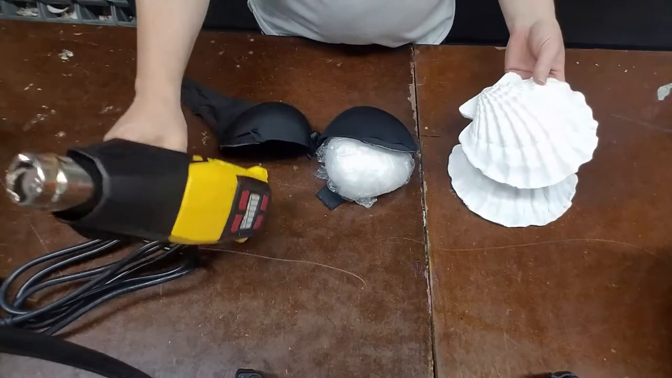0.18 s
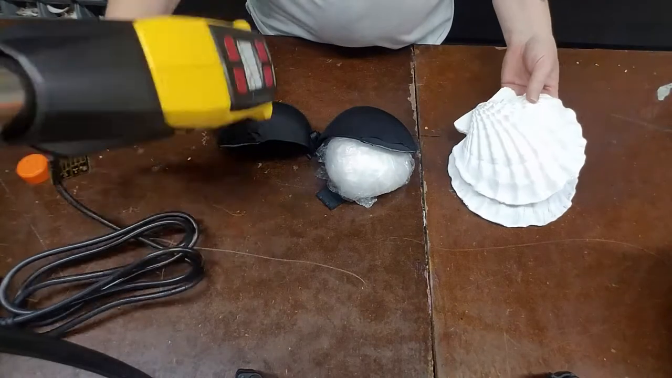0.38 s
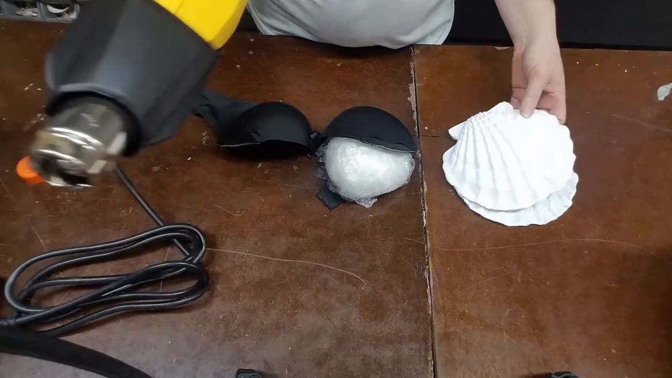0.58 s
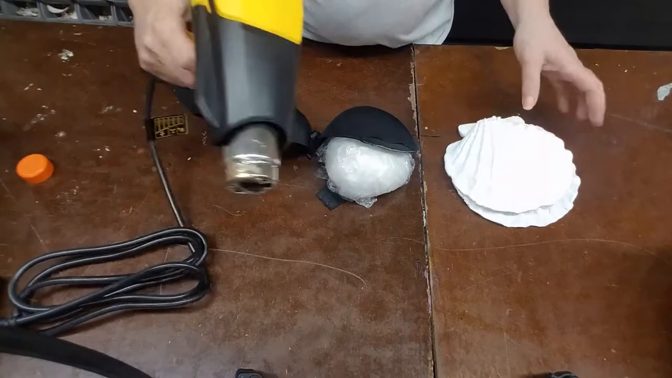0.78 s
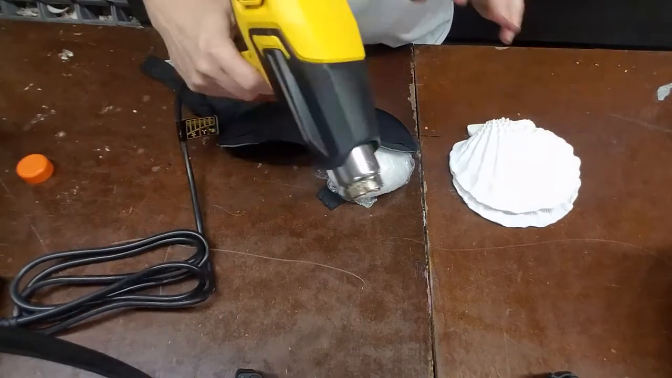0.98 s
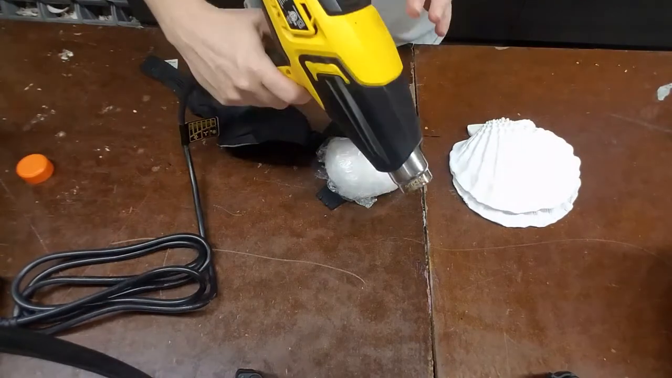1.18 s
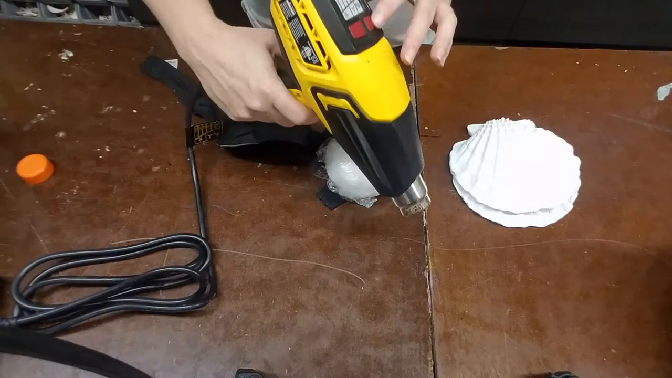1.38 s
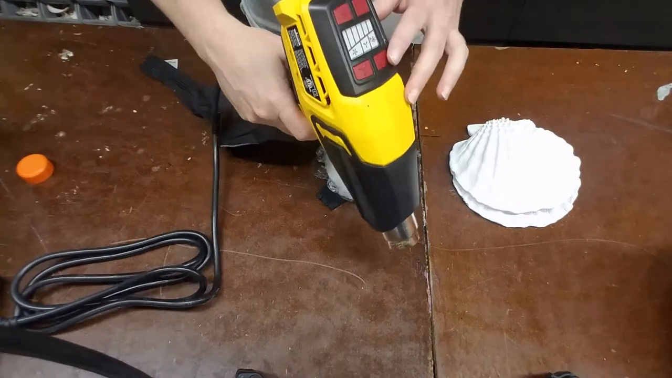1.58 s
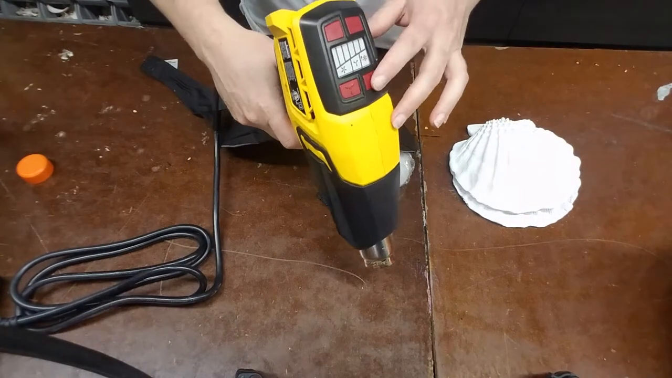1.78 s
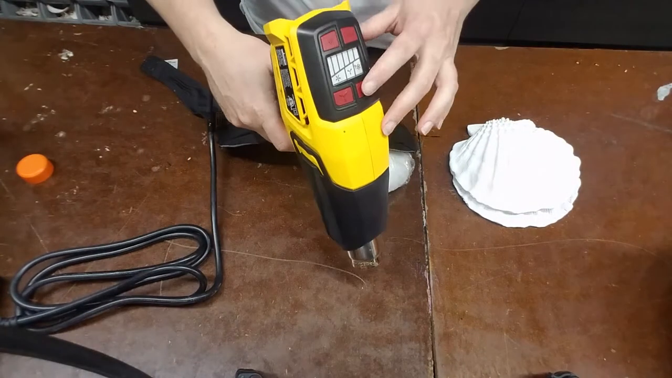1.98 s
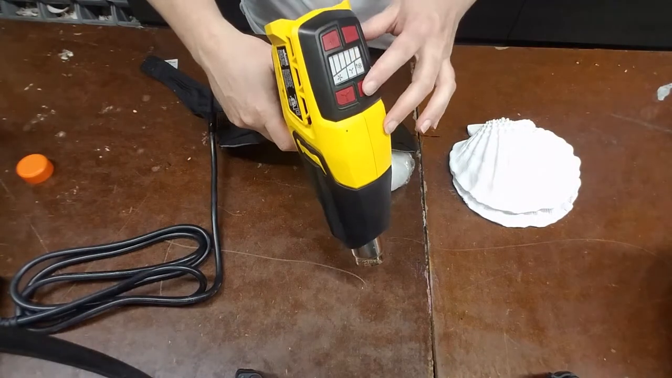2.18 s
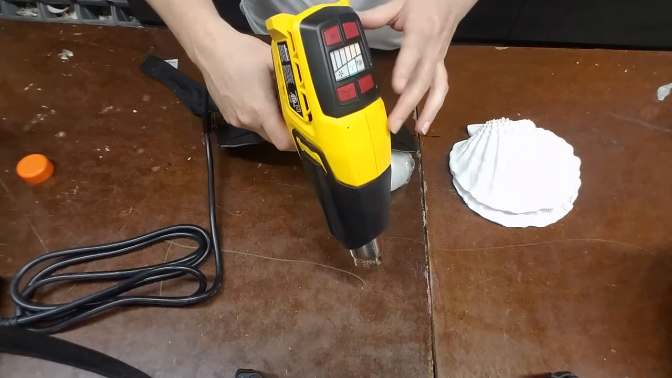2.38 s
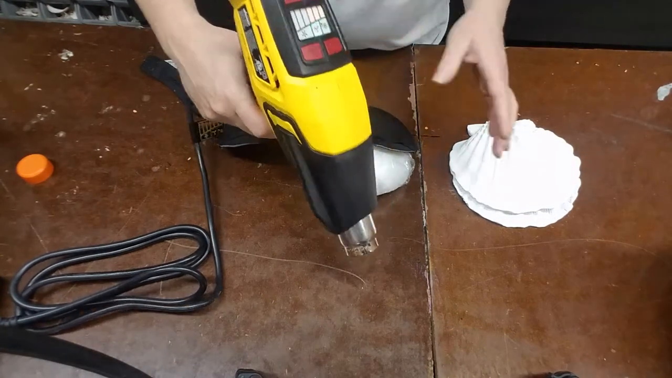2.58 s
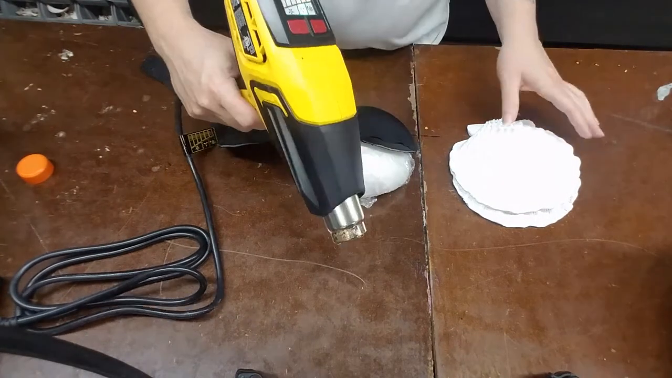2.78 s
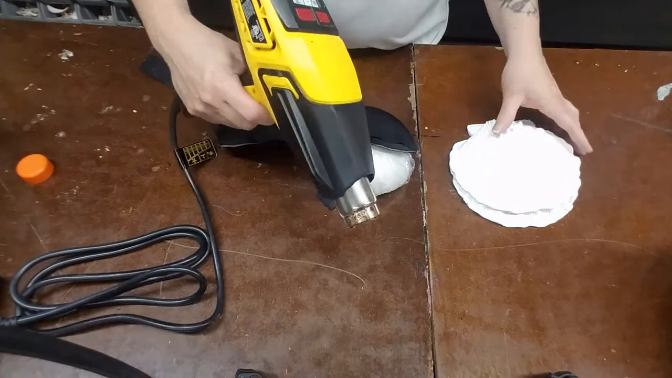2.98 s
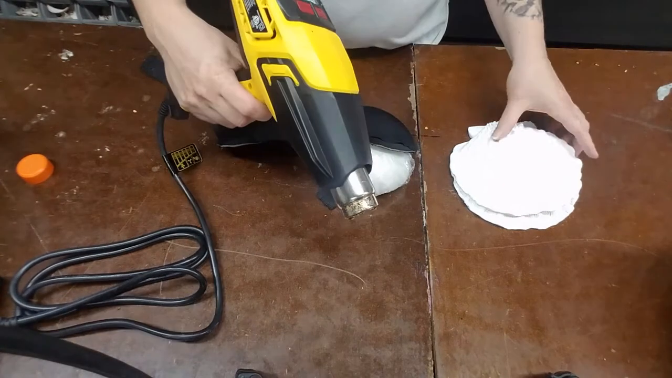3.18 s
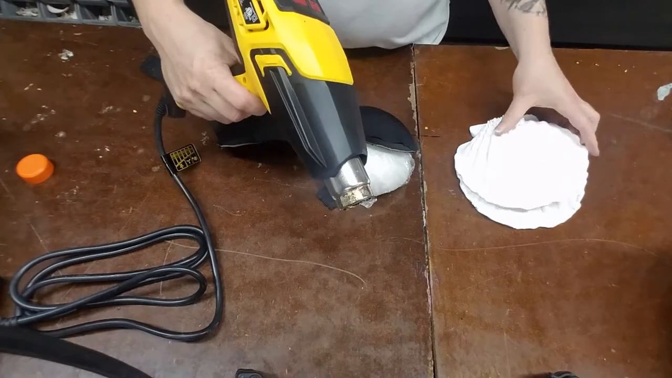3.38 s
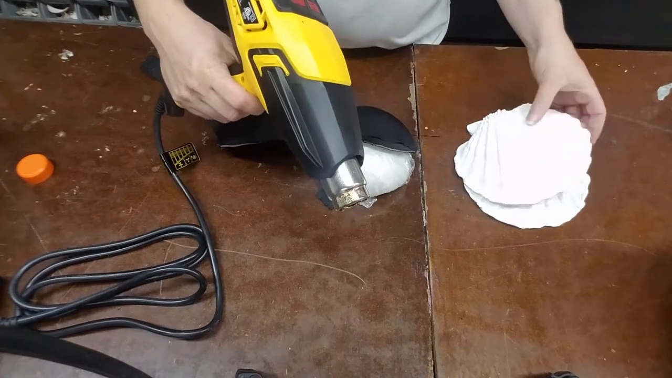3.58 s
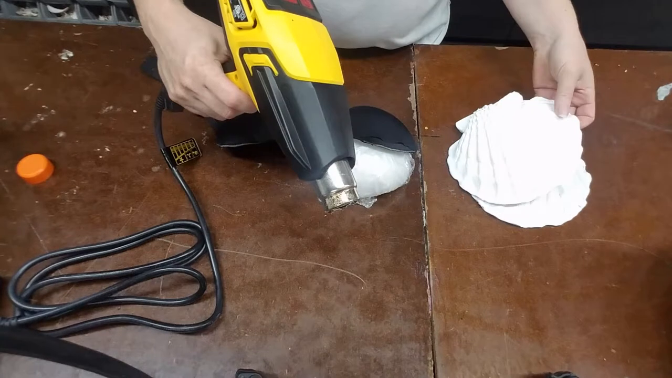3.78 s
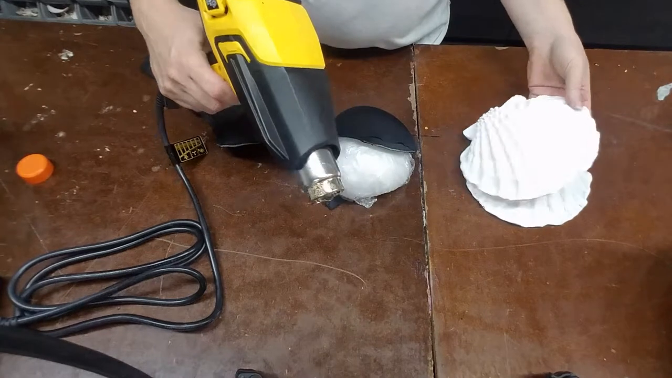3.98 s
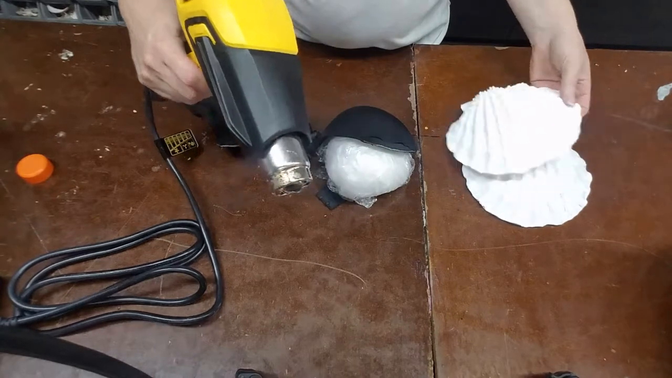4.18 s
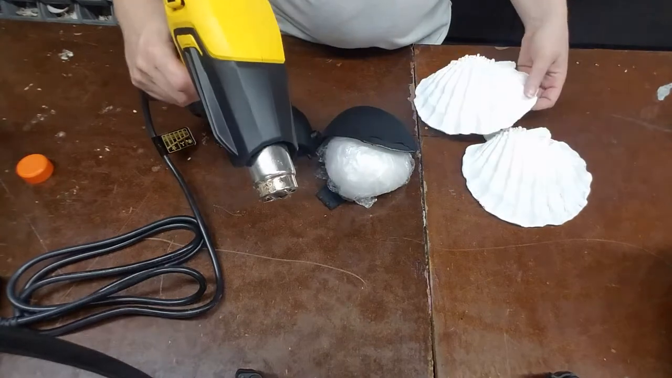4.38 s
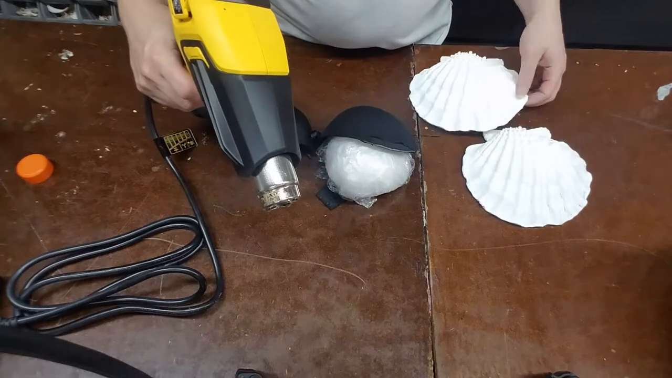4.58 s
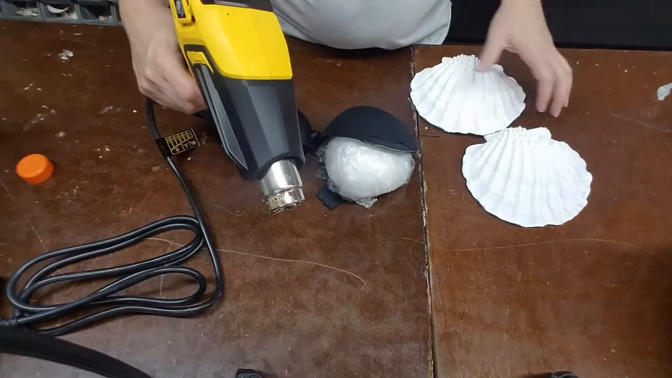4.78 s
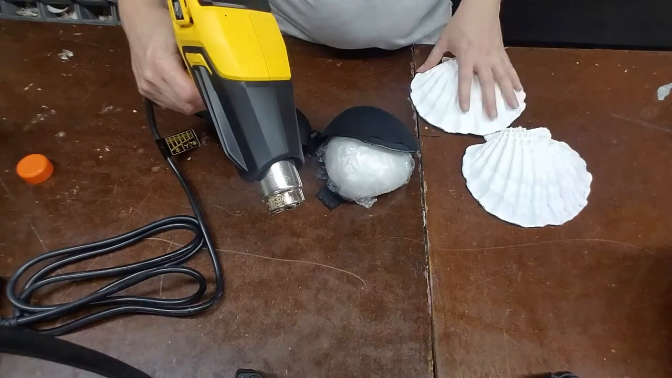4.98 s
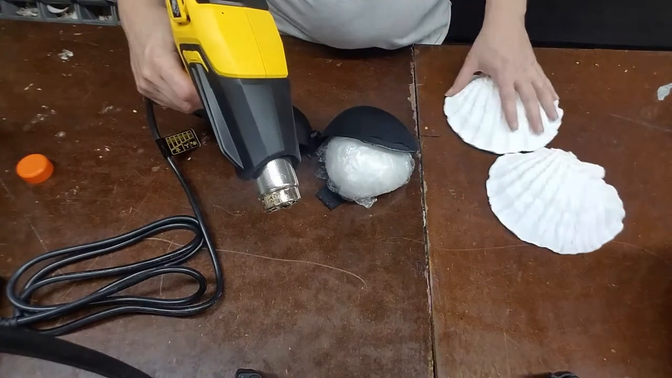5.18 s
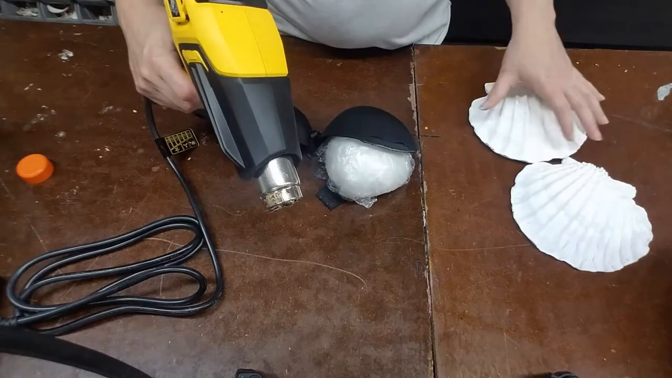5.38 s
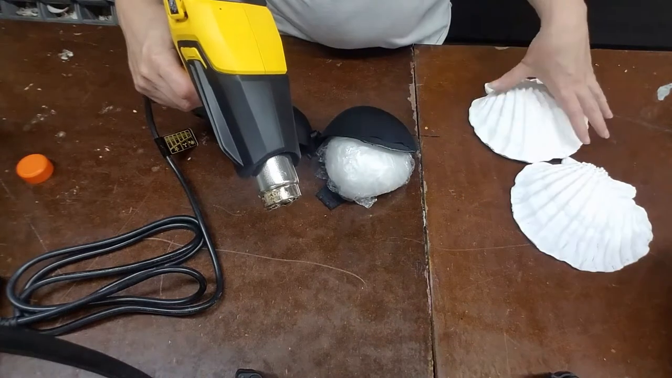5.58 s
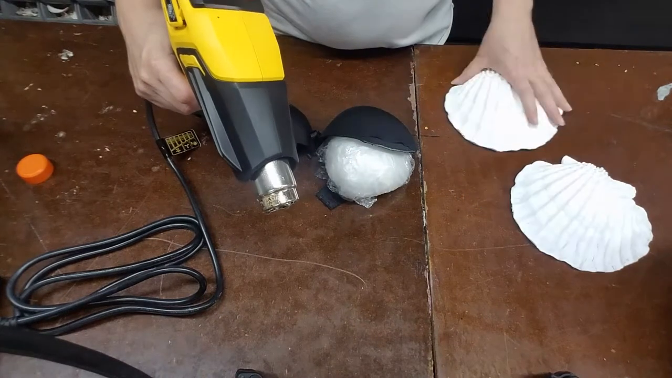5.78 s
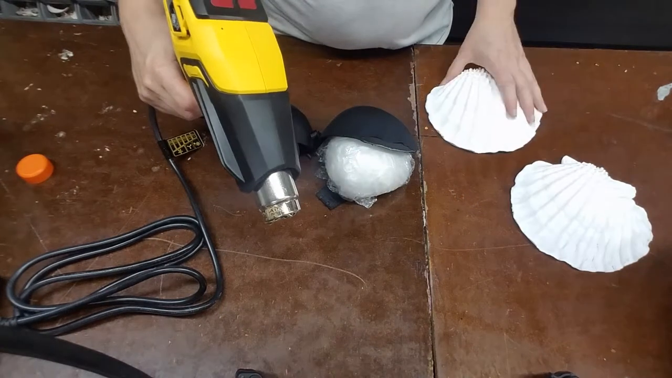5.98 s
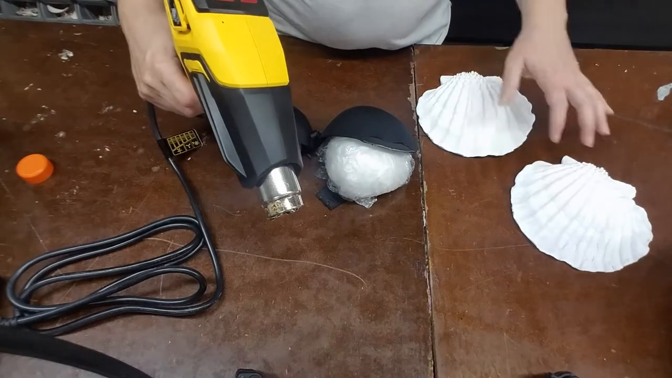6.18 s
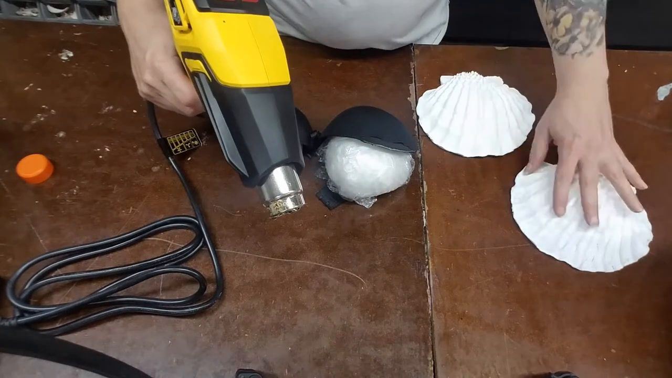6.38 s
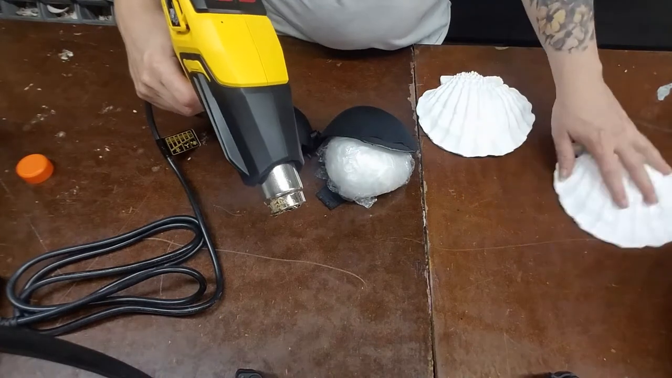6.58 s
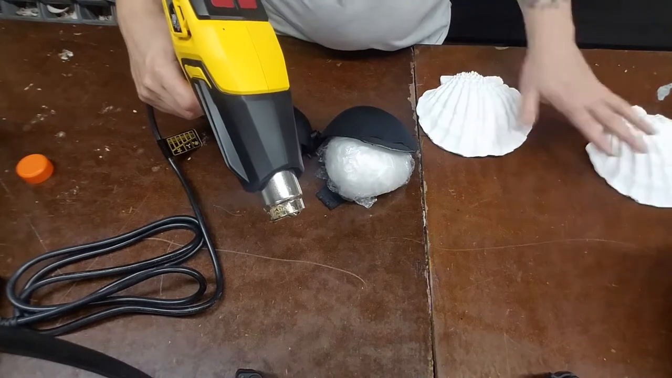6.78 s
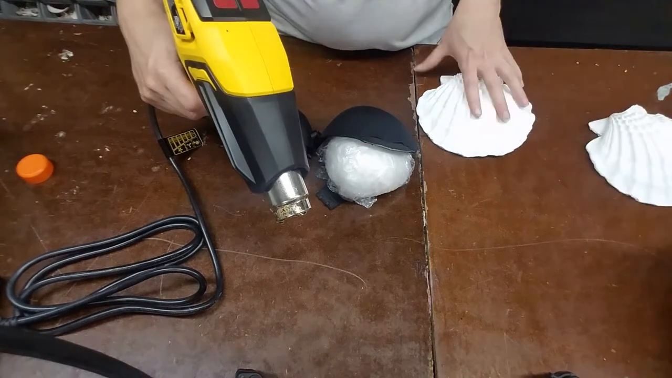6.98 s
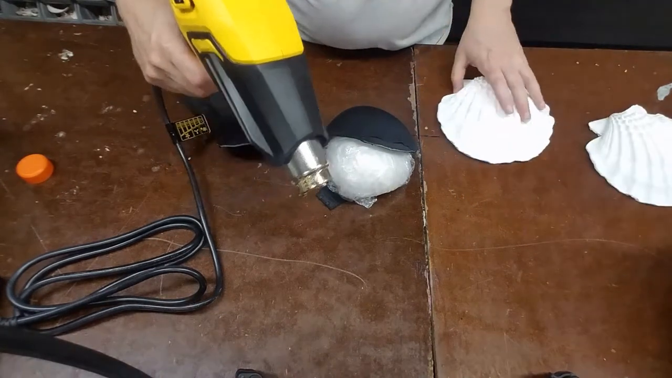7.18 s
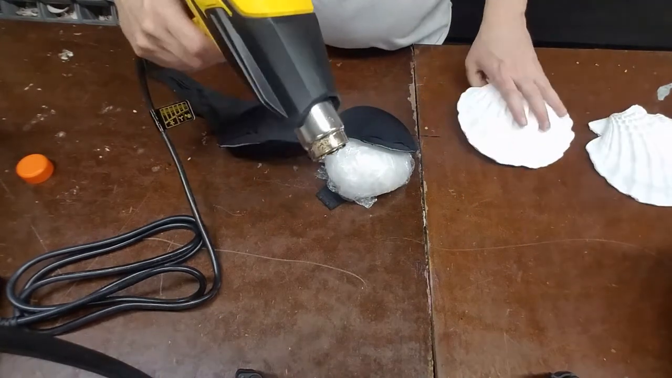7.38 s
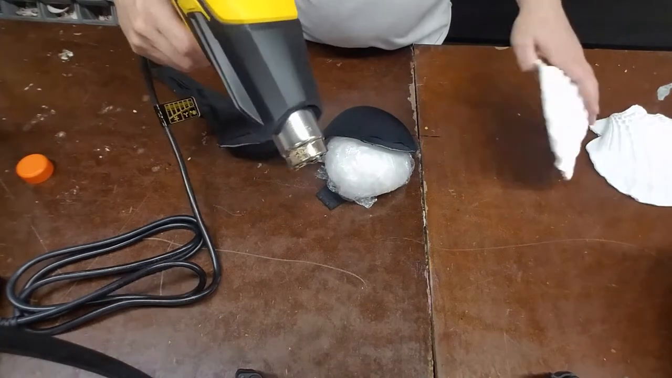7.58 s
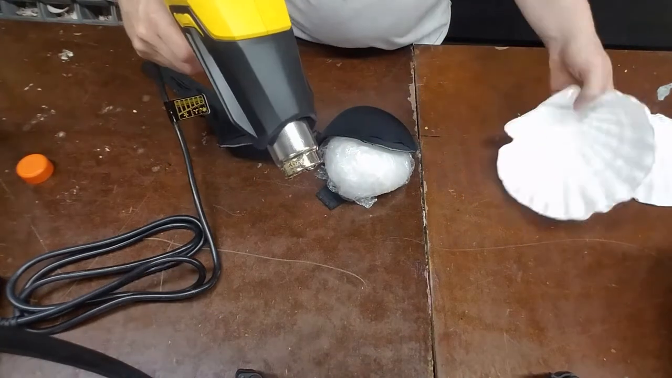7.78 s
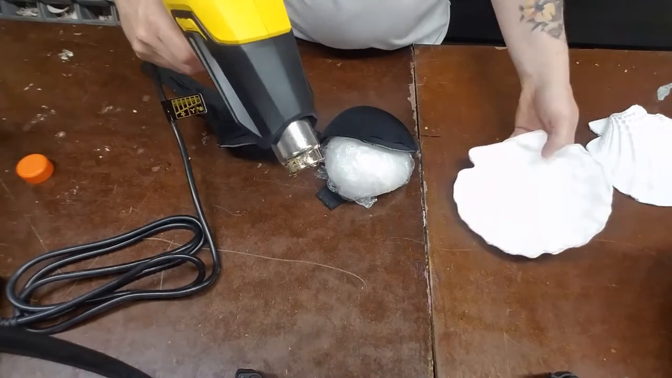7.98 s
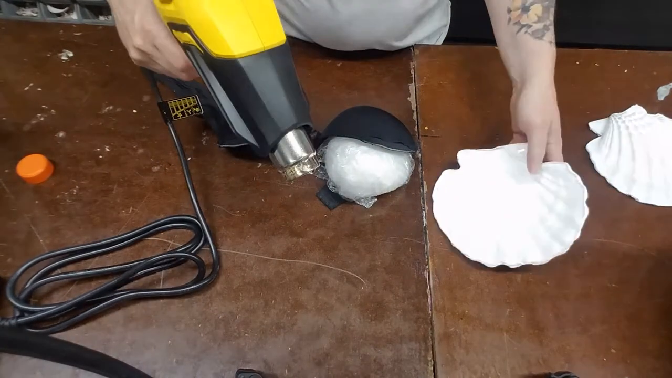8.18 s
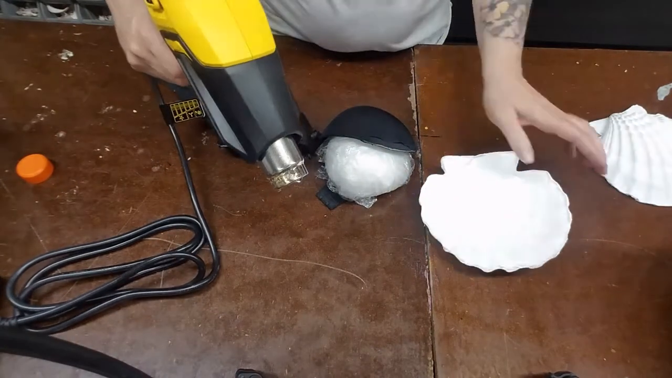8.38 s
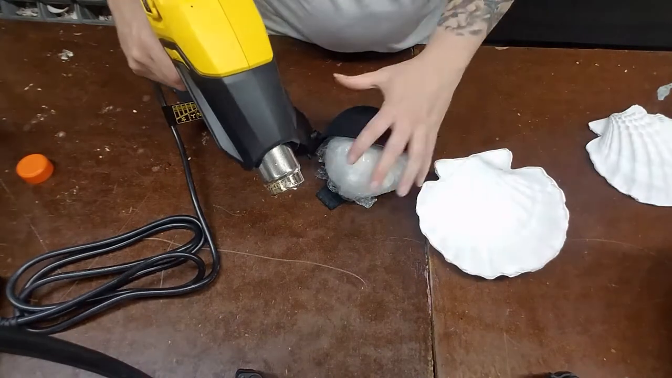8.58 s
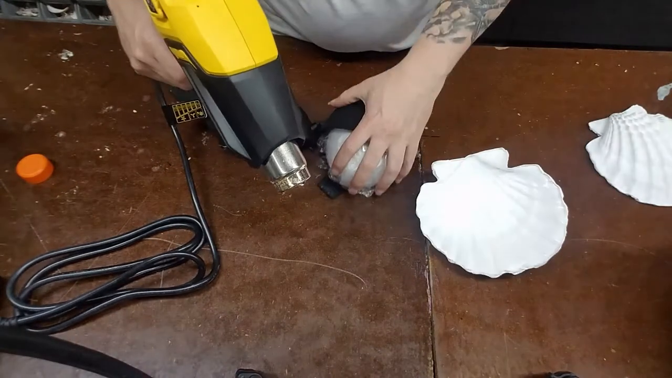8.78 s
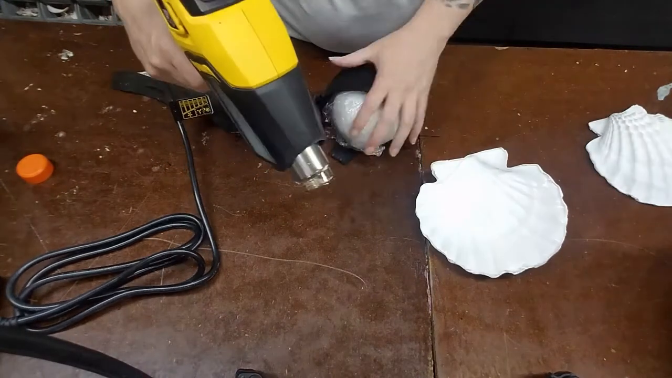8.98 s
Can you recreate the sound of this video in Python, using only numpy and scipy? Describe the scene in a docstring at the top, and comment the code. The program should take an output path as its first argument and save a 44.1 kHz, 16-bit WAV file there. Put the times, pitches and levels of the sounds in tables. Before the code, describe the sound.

A heat gun and two big scallop shells are handled close to the microphone at a wooden bench in a workroom. First the shells clink together with a short, hollow rattle. After a sharp plastic click, the gun starts with a rasp and rises to an even whine over blowing air. Gritty slides and light ringing knocks from the shells continue over the fan, each echoing briefly above a faint low hum.

```python
"""A wooden workbench in a quiet, humming room. A hand-held heat gun is clicked on: its motor rasps,
and the fan winds up to a steady whine, harmonics of the shaft rate, in rushing air.
The other hand stacks, drops and slides two large scallop shells: knocks and rubbing ring their bowls,
their rims and the bench. Shells, clicks and grip echo briefly in the room."""
import sys
import numpy as np
from scipy import signal
from scipy.io import wavfile
from scipy.ndimage import uniform_filter1d

SR = 44100
rng = np.random.default_rng(int(sys.argv[2]) if len(sys.argv) > 2 else 0)


def wav_out(sig):
    """Save sig, one row per channel (or a flat mono array), as 16-bit PCM at SR to the path in sys.argv[1]."""
    wavfile.write(sys.argv[1], SR, np.round(np.clip(np.atleast_2d(sig).T, -1, 1) * 32767).astype(np.int16))


N = 398090

SWITCH_ON_S, SPIN_START_S, SPIN_LAG_S = 2.232, 2.19, .386
SHAFT_TOP_HZ, THROB_HZ = 187.75, 65.35
def heat_gun():
    """The rotor runs up to speed on a pulsing supply, driving whine and rush."""
    t = np.arange(N) / SR
    speed = 1 - np.exp(-np.maximum(t - SPIN_START_S, 0) / SPIN_LAG_S)
    shaft_hz = SHAFT_TOP_HZ * speed * (1 + 0.00146 * spread(drift(2, count=1)[0]))
    angle = 2 * np.pi * np.cumsum(shaft_hz) / SR
    throb = (.5 + .5 * np.cos(2 * np.pi * THROB_HZ * (t - 2.252))) ** 5.5
    return whine(t, speed, shaft_hz, angle) + rush(t, speed, angle, throb) + switch_chatter(t, throb)


# Main whine as the gun speeds up and is turned. Each row: time in seconds, rms level in dB.
WHINE_LEVEL = [(2.45, -76), (2.6, -49), (2.8, -55), (3.1, -49), (3.4, -39), (3.9, -34.5), (4.3, -36.5),
               (7.5, -37), (9.03, -39.5)]
# Other shaft orders. Each entry: multiple of the shaft rate.
ORDERS = [6, 7, 8, 9, 10, 12, 14, 15, 20, 21, 22, 25]
# Each entry: base level of that order in dB.
ORDER_BASE_DB = [-52, -61, -58, -60, -55, -62, -64, -60, -64, -58, -48, -53]
# Casing radiation. Each row: frequency in Hz, gain in dB.
CASING_GAIN = [(300, -28), (600, -10), (800, -3), (1040, 3), (1110, -4), (1450, -1), (1700, -5), (1800, 4),
               (1875, -5), (2600, -3), (3500, -12)]
# Each row: frequency in Hz, left over right in dB.
GUN_PAN = [(60, -3), (180, 2), (550, -1), (1650, 2.5), (4970, 1.5), (15000, -9)]
# Each row: frequency in Hz, left phase lead in radians.
GUN_LEAD = [(0, 6.5), (1890, -1.5), (3270, -2), (4130, -5.5), (7150, -18), (12200, -24.5), (16400, -20)]
WHINE_ORDER, TILT_S, TILT_WIDTH_S, TILT_DB = 5, 7.8, .5, 8
def whine(t, speed, shaft_hz, angle):
    """Shaft orders: low ones from torque, strongest in the run-up; high ones from the blades, at speed."""
    side = np.array([[.5], [-.5]])
    wavers, swells = drift(40, count=len(ORDERS) + 1), drift(1.26, count=len(ORDERS))
    main_db = np.interp(t, *np.transpose(WHINE_LEVEL)) + 0.37 * spread(wavers[-1]) + side * 3.5
    out = gain_of(main_db) * np.sqrt(2) * np.sin(WHINE_ORDER * angle - .7 * side)
    tilt_db = TILT_DB * np.exp(-((t[::64] - TILT_S) / TILT_WIDTH_S) ** 2)
    for order, base_db, waver, swell in zip(ORDERS, ORDER_BASE_DB, wavers, swells):
        load_db = (21 if order < 21 else -160) * (1 - speed[::64])
        db = base_db + load_db + at_hz(CASING_GAIN, order * shaft_hz[::64]) + 2 * waver + 1.5 * swell
        db += tilt_db * ((order == 21) - (order == 22))  # tipping the nozzle drops the top whine an order
        top_hz = order * SHAFT_TOP_HZ
        phase = order * angle + spread(.5 * waver[::-1]) + side * at_hz(GUN_LEAD, top_hz)
        out += gain_of(side * at_hz(GUN_PAN, top_hz)) * spread(gain_of(db)) * np.cos(phase)
    return out * np.clip((t - SWITCH_ON_S) / 0.25, 0, 1)


# Air noise. Each row: frequency in Hz, relative density in dB.
AIR_SPECTRUM = [(88, -37), (150, -23.5), (450, -29.5), (558, -16), (640, -36.5), (764, -9.5), (860, -10),
                (930, -14), (1030, -14.5), (1810, -21), (3330, -29.5), (4050, -29), (5200, -53.5),
                (6000, -36), (7150, -47.5), (14500, -42), (16300, -54)]
# Motor rasp. Each row: frequency in Hz, relative density in dB.
RASP_SPECTRUM = [(210, -58), (350, -9.5), (475, -21.5), (595, 0), (745, -6), (834, -6.5), (1270, -8.5),
                 (1660, -1.5), (2020, -8), (2370, -1), (3020, -10), (3960, -11), (5900, -17), (6700, -20),
                 (10700, -35), (14100, -28), (16300, -53)]
# Each row: frequency in Hz, left-right coherence.
GUN_COHERENCE = [(150, 0.99), (600, 0.83), (1200, 0.92), (3000, 0.32), (12000, 0.076)]
# Middle band as the gun is turned. Each row: time in seconds, gain in dB.
MIDDLE_GAIN = [(2.3, -0.67), (2.8, -0.96), (3.8, -0.39), (5.6, -0.75), (6.8, 0.89), (8, 1), (9.03, 0.74)]
# Treble as the gun is turned. Each row: time in seconds, gain in dB.
TREBLE_GAIN = [(2.3, -2), (2.7, -5), (3.9, -3.5), (4.8, -1.5), (6.5, -1.5), (7.6, -0.5), (9.03, -3.5)]
MIDDLE_FROM_HZ, TREBLE_FROM_HZ = 1300, 3670
def rush(t, speed, angle, throb):
    """Air grows with speed; the rasp's supply throb fades as the rotor gains momentum."""
    rasp = stereo_noise(RASP_SPECTRUM, GUN_COHERENCE, GUN_PAN, GUN_LEAD, patch_db=2.3, patch_frames=150)
    air = stereo_noise(AIR_SPECTRUM, GUN_COHERENCE, GUN_PAN, GUN_LEAD, patch_db=2.3, patch_frames=150)
    depth = 0.065 + .5 * (1 - speed)
    rasp *= gain_of(-33) * (1.3 - speed) * (1 - depth + 1.2 * depth * throb)
    air *= gain_of(-37.5) * speed ** 2.6 * (1 + 0.03 * np.cos(angle))
    full = gain_of(5.5 * (speed - 1.5)) * (rasp + air) * np.clip((t - SWITCH_ON_S) / 0.21, 0, 1)
    below_treble = signal.sosfiltfilt(signal.butter(2, TREBLE_FROM_HZ, fs=SR, output="sos"), full)
    bass = signal.sosfiltfilt(signal.butter(3, MIDDLE_FROM_HZ, fs=SR, output="sos"), below_treble)
    middle = gain_of(np.interp(t, *np.transpose(MIDDLE_GAIN))) * (below_treble - bass)
    treble = gain_of(np.interp(t, *np.transpose(TREBLE_GAIN))) * (full - below_treble)
    return bass + middle + treble


def switch_chatter(t, throb, length_s=0.035):
    """The contacts chatter as they close."""
    envelope = (t > SWITCH_ON_S) * np.exp(-(abs(t - SWITCH_ON_S) / length_s) ** 3)
    return gain_of(-44.5) * (.6 + throb) * envelope * rng.standard_normal((2, N))


def shells():
    """Knocks and slides drive four parts: bowl, rim, bench and a bright gritty scratch."""
    grit = signal.firwin(41, [10500, 16000], pass_zero=False, fs=SR)
    grit = np.pad(grit / np.linalg.norm(grit), (0, 4000 - len(grit)))
    parts = shell_knocks(grit) + shell_slides(grit)
    pan_db = np.array([3, 4, 2, -5])[:, None]
    left, right = (gain_of(pan_db / 2) * parts).sum(0), (gain_of(-pan_db / 2) * parts).sum(0)
    return np.array([left, np.roll(right, 6)])


# Modes of shell bowl, shell rim and bench. Each row: frequency in Hz, level in dB, t60 in seconds.
BOWL_MODES = [(630, -10, 0.11), (724, 0.5, 0.099), (791, 9, 0.042), (903, 1, 0.02), (1247, 4.5, 0.026)]
RIM_MODES = [(1770, -3, .05), (1920, -1, .06), (2100, 0, .08), (2260, 0, .06), (2460, -1, .05),
             (2640, -4, .04), (2825, 0, .06), (3150, -1, .04), (3520, -4, .04), (4060, -3, .04),
             (4440, -3, .04), (5100, -5, .02), (5800, -7, .012), (7000, -9, .008)]
BENCH_MODES = [(80, -17, .07), (110, -7, .05), (212, -1, .07), (305, -1, .07), (390, -2, .06),
               (500, -10, .04)]
# Each row: start in seconds, peaks of bowl, rim, bench and grit in dB, rim centre in Hz.
SHELL_KNOCKS = [(0.299, -31, -27.5, -46.5, -45, 1840), (0.423, -27.5, -48, -63, -58, 1810),
                (0.456, -35, -34, -54, -36, 5050), (0.531, -29, -65, -48, -37, 1880),
                (0.645, -31, -42, -59, -65, 1770), (0.673, -10.5, -11.5, -23.5, -52, 1860),
                (0.679, -10.5, -24, -53, -52, 2320), (0.689, -8.5, -32, -44, -28, 2130),
                (0.703, -17, -11.5, -35, -51.5, 2600), (0.732, -19, -16, -39, -49.5, 2550),
                (0.736, -12, -15, -46, -43, 1830), (0.752, -21, -30, -29, -47, 2044),
                (0.762, -24, -28.5, -53.5, -46.5, 2500), (0.776, -24, -40, -38, -55, 2120),
                (0.787, -24, -38, -60, -57, 2300), (0.851, -34.5, -37, -59, -52, 1800),
                (4.25, -30, -34, -32.5, -41, 2020), (4.562, -20.5, -33, -45, -52, 3500),
                (4.568, -16, -13.5, -34, -33, 2850), (4.596, -23, -23, -42, -52, 3560),
                (4.612, -20.5, -24, -39, -50, 3520), (4.62, -22, -18.5, -32, -52, 3430),
                (4.626, -25, -28, -46, -52, 1910), (5.609, -25, -20, -25.5, -32, 3150),
                (5.621, -32, -27, -40, -40, 5150), (5.674, -34, -27, -36, -55, 3250),
                (5.946, -46, -40, -36.5, -60, 2500), (6.007, -28, -20, -34, -48, 3220),
                (6.036, -25.5, -24.5, -34, -55, 1900), (6.08, -40, -31, -43, -58, 3300),
                (6.466, -27, -25.5, -46, -45, 2750), (6.58, -28, -41, -57.5, -32, 1800),
                (6.592, -24.5, -19, -44, -24, 1740), (6.624, -52, -31, -47, -30, 5100),
                (6.638, -44, -29, -54, -34, 5640), (6.92, -58, -40, -45, -36, 4150),
                (6.946, -42, -32, -36.5, -20, 5150), (7.814, -29, -10, -30, -33, 2480),
                (7.819, -40, -24, -41, -52, 2400), (7.827, -33, -30, -48, -52, 3530),
                (7.935, -42, -12.5, -36, -33, 2420), (8.102, -31, -29.5, -31.5, -64, 1800),
                (8.323, -48, -24.5, -27, -65, 2250)]
LIFTED_S = 7.7  # off the bench, the rim rings longer
def shell_knocks(grit):
    """A first touch and tiny rebounds ring each part; each spot on the rim wakes other modes."""
    out, t = np.zeros((4, N)), np.arange(900) / SR
    slow_blow = signal.gausspulse(np.arange(-.0016, .0016, 1 / SR), fc=950, bw=.8)  # the bowl is heavy
    bowl = np.convolve(ring(BOWL_MODES, damping=1.13), slow_blow)[:4000]
    bench, rim_hz, count = ring(BENCH_MODES), np.array(RIM_MODES)[:, :1], len(RIM_MODES)
    for start_s, *peaks_db, centre_hz in SHELL_KNOCKS:
        burst = rng.standard_normal(len(t))
        force = 2 * (t == 0) + .035 * burst ** 3 * np.exp(-t / .004)
        octaves = np.log2(rim_hz / centre_hz)
        spot_db = np.maximum(np.minimum(36 * octaves, -11 * octaves), -18) + burst[-count:, None]
        rim = ring(RIM_MODES, lift_db=spot_db, damping=1.4 if start_s > LIFTED_S else 1.7,
                   detune=1 + .012 * burst[:count, None], sign=np.sign(burst[count:2 * count, None]))
        parts = signal.fftconvolve(force[None], [bowl, rim, bench, grit], axes=1)
        add(out, start_s, (gain_of(peaks_db) / abs(parts).max(axis=1))[:, None] * parts)
    return out


# Each row: start in seconds, length in seconds, fraction of the stroke at which pressure peaks,
# full-pressure drive of bowl, rim, bench and grit in dB.
SHELL_SLIDES = [(0.377, 0.4, 0.065, -41.5, -43, -52, -62), (0.557, 0.2, 0.72, -38, -41.5, -72, -55),
                (0.725, 0.11, 0.11, -24, -35, -38, -58), (3.529, 0.13, 0.58, -33, -48, -49.5, -59),
                (4.557, 0.16, 0.49, -34, -39.5, -60, -57), (4.926, 0.31, 0.56, -36.5, -46, -52.5, -54),
                (5.548, 0.13, 0.44, -34, -40, -64, -62), (5.875, 0.29, 0.71, -47, -56, -44, -75),
                (6.249, 0.39, 0.66, -39.5, -39, -69, -47.5), (6.526, 0.19, 0.61, -36, -38, -64, -50),
                (6.939, 0.044, 0.26, -60, -37, -60, -36), (8.056, .2, 0.71, -66, -52, -33.5, -76),
                (8.23, 0.076, 0.32, -57, -60, -37.5, -76), (8.306, 0.18, 0.3, -62, -51, -37, -84),
                (8.46, 0.49, 0.19, -59, -66, -48, -62), (8.657, 0.49, 0.43, -62, -49, -47.5, -60)]
RIBS_PER_S, LIGHT_TOUCH_DB = 86, -22.5
def shell_slides(grit):
    """Grainy friction rings a hand-damped shell while its ribs skip over the bench."""
    force = np.zeros((4, N))
    for start_s, length_s, peak_at, *levels_db in SHELL_SLIDES:
        progress = np.arange(0, length_s, 1 / SR) / length_s
        count = len(progress)
        fine, coarse, pace, weight = rng.standard_normal((4, SR // 2))[:, :count]
        grains = unit_rms(fine * gain_of(3.1 * coarse.repeat(200)[:count]))
        ribs_passed = np.cumsum(RIBS_PER_S * (1 + 3.5 * uniform_filter1d(pace, 300))) / SR
        skips = abs(np.diff(np.floor(ribs_passed), prepend=0)) * gain_of(2 * weight)
        on_bench = unit_rms(unit_rms(skips) + 0.88 * grains)
        pressure_db = np.interp(progress, [0, peak_at, 1], [LIGHT_TOUCH_DB, 0, LIGHT_TOUCH_DB])
        pressure = gain_of(np.add.outer(levels_db, pressure_db)) * signal.windows.tukey(count, .04)
        add(force, start_s, pressure * [grains, grains, on_bench, grains])
    rim_hz = np.array(RIM_MODES)[:, :1]
    rim = ring(RIM_MODES, lift_db=-3 * np.log2(rim_hz / 2000), damping=4.24)
    bodies = np.array([ring(BOWL_MODES, damping=1.8), rim, ring(BENCH_MODES[2:], damping=1.5), grit])
    return signal.oaconvolve(force, bodies, axes=1)[:, :N]


# Plastic casing. Each row: frequency in Hz, level in dB, t60 in seconds.
CASING_MODES = [(575, -8, .05), (950, -8, .012), (1464, -3, .012), (1770, 0, .018), (2745, 2, .022),
                (3170, 0, .016), (4900, 3, .006), (7000, 2, .003), (12000, -4, .0015)]
# Button clicks, creaks and the motor's first jolts rattling the casing.
# Each row: start in seconds, peak in dB, centre in Hz.
CASING_CLICKS = [(0.963, -43, 1300), (1.028, -43, 6870), (1.505, -38, 1360), (1.546, -43.5, 7000),
                 (1.597, -46.5, 875), (1.641, -47, 1660), (1.817, -33, 1780), (1.897, -48.5, 2200),
                 (1.929, -46, 1500), (2.048, -17.5, 2550), (2.061, -37, 2980), (2.171, -42, 1940),
                 (2.206, -41, 1800), (2.232, -26.5, 620), (2.251, -26, 2200), (2.263, -27.5, 1750),
                 (2.28, -37, 1750)]
def casing_clicks(pan_db=6):
    """Dry snaps in the gun's plastic; each favours the modes near its centre."""
    out, hz, sample = np.zeros((2, N)), np.array(CASING_MODES)[:, :1], np.arange(900)
    for start_s, peak_db, centre_hz in CASING_CLICKS:
        burst = rng.standard_normal(len(sample))
        body = ring(CASING_MODES, lift_db=-7 * abs(np.log2(hz / centre_hz)), damping=2.5,
                    detune=1 + 0.03 * burst[-len(hz):, None])
        force = burst * np.exp(-sample / SR / 0.003) + 5 * (sample == 40)
        snap = signal.fftconvolve(force, body)
        snap *= gain_of(peak_db) / abs(snap).max()
        add(out, start_s, gain_of([[pan_db / 2], [-pan_db / 2]]) * [np.roll(snap, 4), snap])
    return out


def grip(start_s=0.99, length_s=0.24):
    """Skin rubs the casing and lets go."""
    out, progress = np.zeros(N), np.arange(0, length_s, 1 / SR) / length_s
    body = ring(CASING_MODES[2:7:2], lift_db=np.array([[0], [-3], [3]]), damping=0.98, detune=0.85)
    rub = unit_rms(signal.fftconvolve(rng.standard_normal(SR), body)[:len(progress)])
    add(out, start_s, gain_of(-67.5 - 15 * progress) * signal.windows.tukey(len(rub), .2) * rub)
    return out


def room_echoes(x, t60_s):
    """Sparse decaying reflections of random sign, separate for each channel."""
    taps = np.zeros((2, SR // 2))
    slots = np.arange(200, SR // 2 - 20, 20)
    delays = slots + rng.integers(0, 20, (2, len(slots)))
    np.put_along_axis(taps, delays, rng.choice([-1., 1.], delays.shape), 1)
    taps *= gain_of(-60 * np.arange(SR // 2) / SR / t60_s)
    return signal.fftconvolve(x, taps / np.linalg.norm(taps[0]), axes=1)[:, :N]


# Each row: frequency in Hz, relative density in dB.
HUM_SPECTRUM = [(12, -34), (20, -15), (49, -22), (100, -9), (194, -21), (1010, -28.5), (1380, -30),
                (2100, -28.5), (2630, -34.5), (3580, -34.5), (8790, -47.5), (15000, -36), (16300, -31)]
# Each row: frequency in Hz, left-right coherence.
HUM_COHERENCE = [(30, 0.4), (80, 0.8), (400, 0.22), (2000, 0.53), (12000, 0.24)]
# Each row: frequency in Hz, left over right in dB.
HUM_PAN = [(100, 2), (3000, 4.5), (9000, -1.5)]
def room_hum(rms_db=-63.5):
    """Faint broad noise, strongest in the bass."""
    lead = [(0, 0.0046), (1, 0.0027)]
    hum = stereo_noise(HUM_SPECTRUM, HUM_COHERENCE, HUM_PAN, lead, patch_db=3, patch_frames=16)
    return gain_of(rms_db) * hum


def room_drone(centre_hz=104, width_hz=20.7, rms_db=-63):
    """Noise wavers in one narrow low resonance, alike in both channels."""
    resonance = signal.iirpeak(centre_hz, centre_hz / width_hz, fs=SR)
    return gain_of(rms_db) * unit_rms(signal.lfilter(*resonance, rng.standard_normal(N)))


def ring(modes, lift_db=0, damping=1, detune=1, sign=1):
    """A body's response to one tap, energy 1; nothing radiates far below its lowest mode."""
    hz, db, t60_s = np.transpose(modes)[:, :, None]
    t = np.arange(4000) / SR
    decay = gain_of(db + lift_db - 60 * t * damping / t60_s)
    x = (sign * decay * np.sin(2 * np.pi * hz * detune * t)).sum(0)
    x = signal.sosfilt(signal.butter(3, 0.95 * hz.min(), "high", fs=SR, output="sos"), x)
    return x / np.linalg.norm(x)


def stereo_noise(spectrum, coherence, pan, lead, patch_db, patch_frames):
    """Partly coherent noise of rms 1 whose colour shifts in random patches."""
    frames, hz = N // 256 + 5, np.fft.rfftfreq(1024, 1 / SR)
    re, im, own_re, own_im, patches = rng.standard_normal((frames, 513, 5), dtype=np.float32).T
    patches = unit_rms(uniform_filter1d(uniform_filter1d(patches, 12, axis=0), patch_frames, axis=1))
    alike, left = at_hz(coherence, hz)[:, None], re + 1j * im
    right = alike * left + np.sqrt(1 - alike ** 2) * (own_re + 1j * own_im)
    right *= np.exp(-1j * at_hz(lead, hz))[:, None]
    lean = gain_of(at_hz(pan, hz) / 2)[:, None]
    colour = gain_of(at_hz(spectrum, hz)[:, None] + patch_db * patches)
    bins = np.array([left * lean, right / lean]) * colour
    return unit_rms(signal.istft(bins, nperseg=1024, noverlap=768)[1][:, :N])


def drift(top_hz, count):
    """Slow random curves of rms 1, one value every 64 samples."""
    t = np.arange(0, N, 64) / SR
    hz = np.geomspace(top_hz / 20, top_hz, 20)[:, None]
    return np.array([unit_rms((np.sin(2 * np.pi * (hz * t + offsets)) / np.sqrt(hz)).sum(0))
                     for offsets in rng.random((count, 20, 1))])


def spread(slow):
    """A slow curve at every sample."""
    return np.interp(np.arange(N), np.arange(0, N, 64), slow)


def at_hz(table, hz):
    """Interpolates a table over log frequency."""
    table_hz, values = np.transpose(table)
    return np.interp(np.log(hz + 1), np.log(table_hz + 1), values)


def gain_of(db):
    """Decibels to gain."""
    return 10 ** (np.asarray(db) / 20)


def unit_rms(x):
    """Scales to rms 1."""
    return x / np.sqrt(np.mean(x ** 2) + 1e-20)


def add(mix, start_s, sound):
    """Mixes a sound in."""
    part = mix[..., round(start_s * SR):][..., :sound.shape[-1]]
    part += sound[..., :part.shape[-1]]


def scene():
    """All sources; the handling sounds echo in the room."""
    handling = shells() + casing_clicks() + grip()
    hum = room_hum()
    echoes = gain_of(-9.5) * room_echoes(handling, t60_s=0.18)
    return heat_gun() + handling + echoes + hum + room_drone()


def record(dry):
    """Steep low-pass at 16050 Hz."""
    return signal.oaconvolve(dry, signal.firwin(511, 16050, window=("kaiser", 9), fs=SR)[None], "same")


dry = scene()
out = record(dry)
wav_out(out)
```